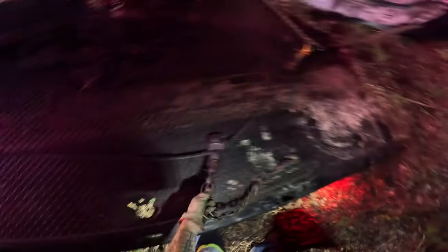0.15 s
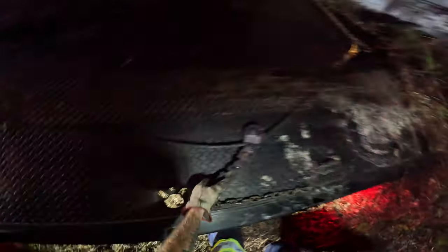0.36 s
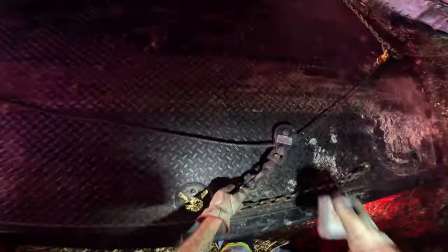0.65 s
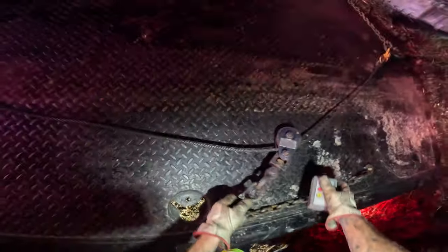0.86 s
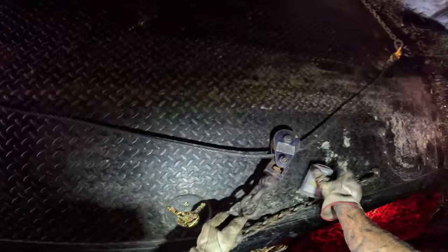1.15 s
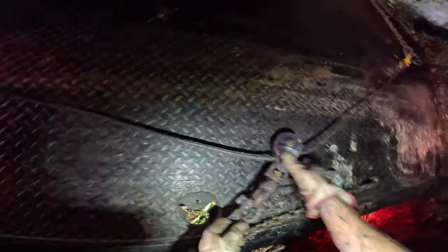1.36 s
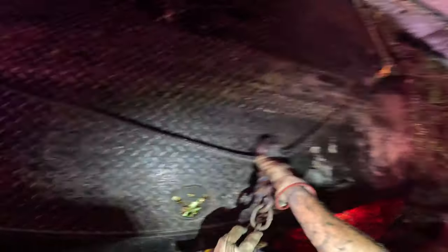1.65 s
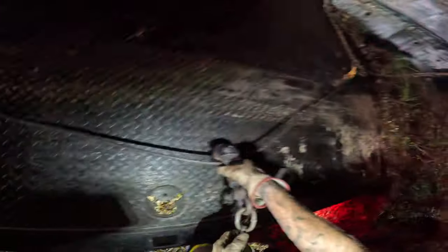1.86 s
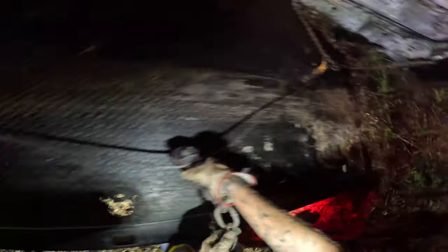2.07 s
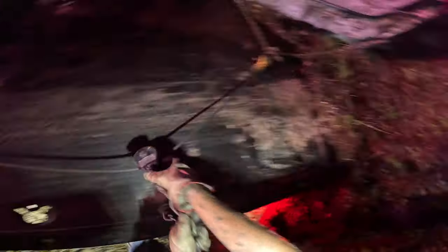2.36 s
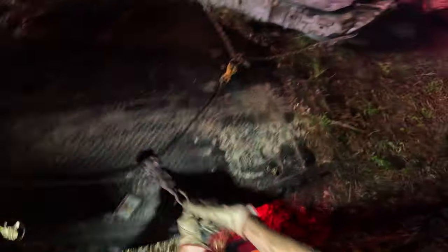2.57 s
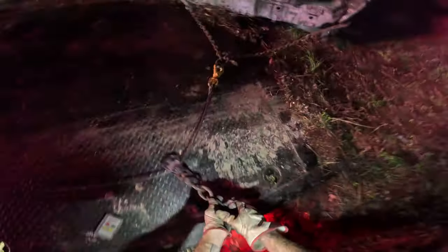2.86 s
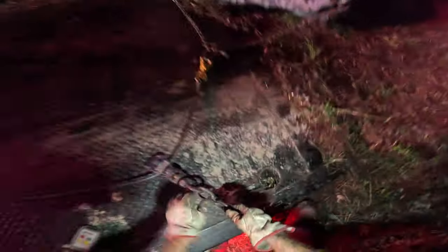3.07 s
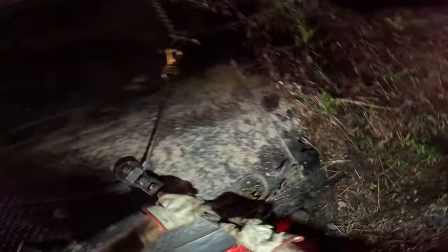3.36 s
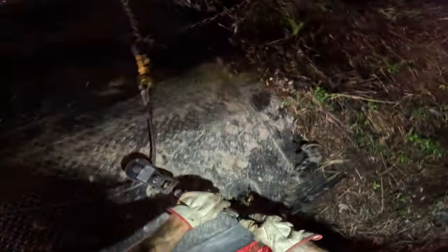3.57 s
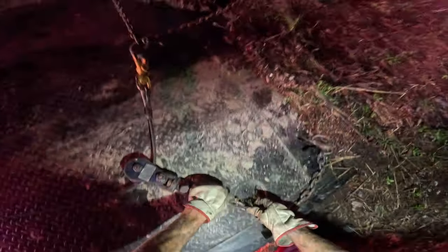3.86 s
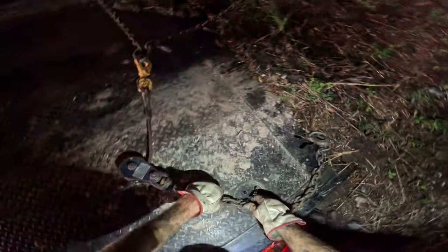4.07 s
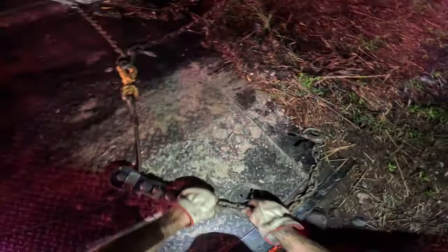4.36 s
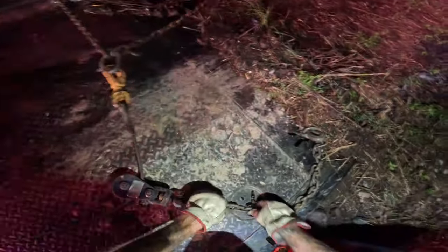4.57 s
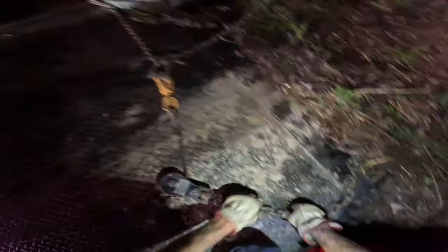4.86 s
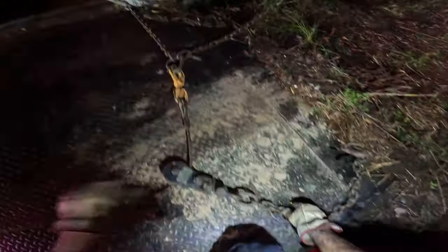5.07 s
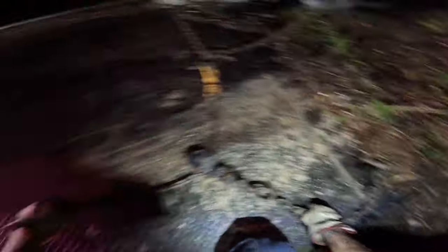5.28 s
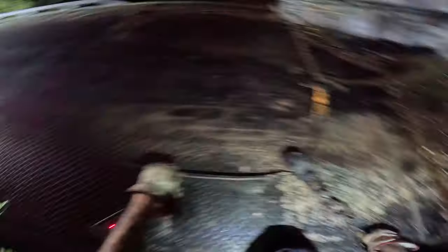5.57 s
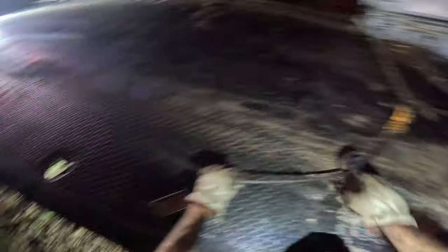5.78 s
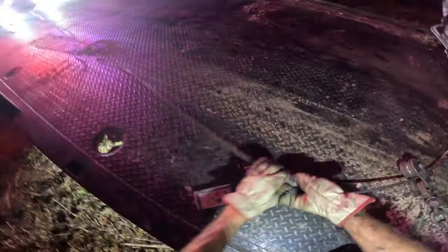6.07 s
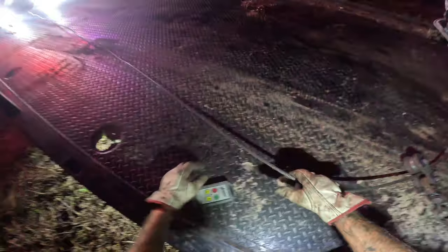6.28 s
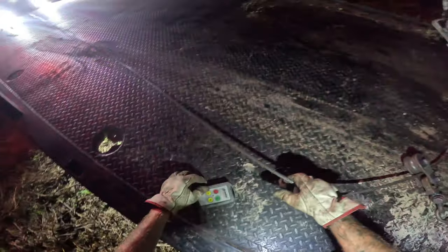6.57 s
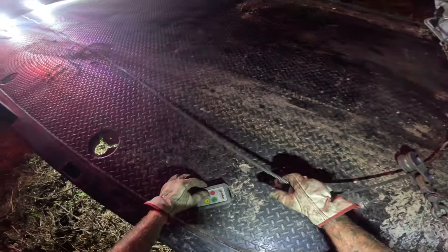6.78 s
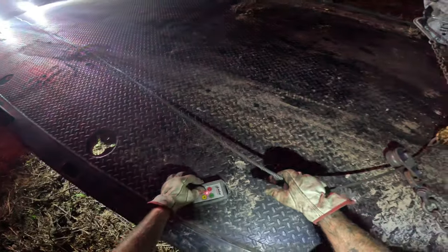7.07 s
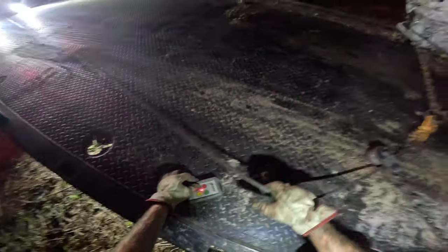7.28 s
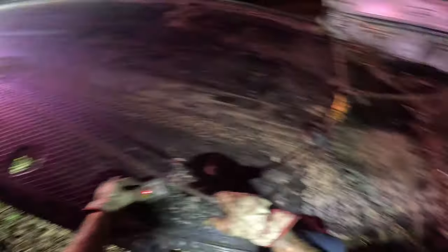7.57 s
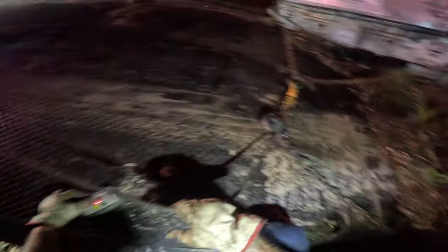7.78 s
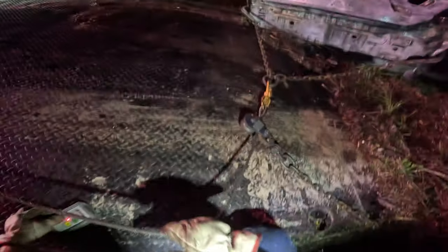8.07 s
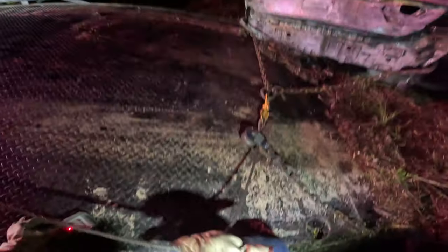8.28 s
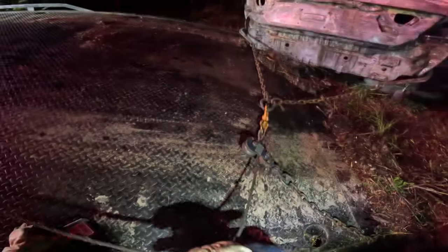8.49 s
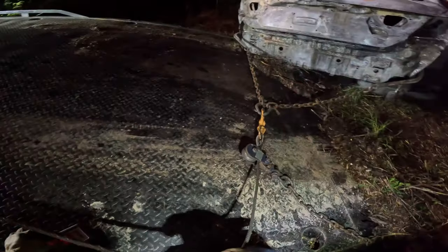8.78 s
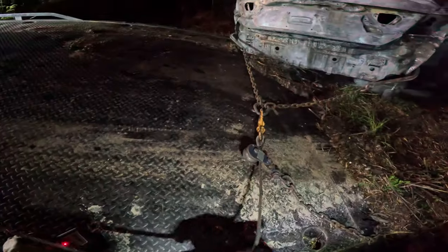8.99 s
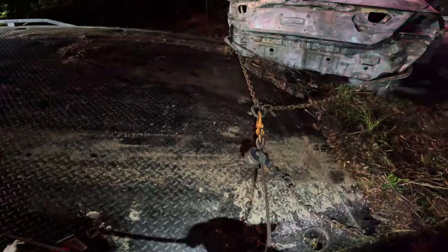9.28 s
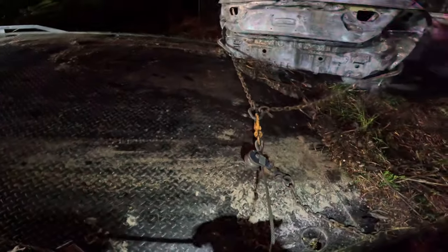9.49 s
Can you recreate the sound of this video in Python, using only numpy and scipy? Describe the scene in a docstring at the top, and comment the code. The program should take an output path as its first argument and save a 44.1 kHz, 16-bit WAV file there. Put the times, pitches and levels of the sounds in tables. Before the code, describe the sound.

A chain is hauled by hand over ribbed steel plate: sharp link cracks, deep hollow thuds, gritty scraping and piercing metal squeaks, all dry and near the body-worn microphone in open air. An idling truck engine hums underneath. The handling thins out after six seconds, then a winch starts abruptly with rushing oil, gear whine and a loud pulsating drone.

```python
"""A chain and a pulley block dragged over the steel flatbed of an idling tow truck, outdoors, microphone worn close.
Links clink as noise bursts rung around a pitch; the deck booms from crowded modes; steel squeals in sung modes.
Squeaks of the sheave are short rough sines, and cloth bumps the microphone in low noise. Behind, the engine and
pump hum in steady tones; then the winch starts, in gear and motor tones over rushing oil, its drone throbbing
against the engine."""
import sys
import numpy as np
from scipy import signal
from scipy.fft import rfft, irfft, next_fast_len
from scipy.io import wavfile
from scipy.ndimage import map_coordinates

SR = 44100
rng = np.random.default_rng(int(sys.argv[2]) if len(sys.argv) > 2 else 0)


def materialize(psi):
    """Save the field psi as 16-bit PCM at rate SR to the path in sys.argv[1].

    A 1-D psi becomes a single channel; in a 2-D psi each row is a channel.
    """
    bounded = np.clip(np.atleast_2d(psi).T, -1, 1)
    quanta = np.round(bounded * 32767).astype(np.int16)
    wavfile.write(sys.argv[1], SR, quanta)


N = 424683  # length in samples

# Clothes jostling the worn microphone. Each row: time in seconds, level in dB.
CLOTH_BUMP = [(1.98, -47), (2.2, -32), (2.3, -20.5), (2.48, -35)]

# Exhaust from where the worker stands. Each row: time in seconds, level of the firing tone in dB.
EXHAUST = [(.8, -51), (2.6, -40.5), (3.6, -46), (5.3, -29.5), (6.1, -42.5), (7, -38.5), (7.4, -34)]
# Hum of the hydraulic pump. Each row: time in seconds, level in dB before each line's own share.
PUMP_HUM = [(.8, -39), (2.3, -33), (5, -36.5), (7, -28.5)]
# Noise of the engine bay. Each row: frequency in Hz, relative density in dB per Hz.
BAY_NOISE = [(25, -18), (55, -14), (90, 0), (190, -4), (700, -22.5), (2400, -34), (7000, -44), (8500, -58),
             (15000, -72)]
FIRING_HZ = 56.7  # before the load slows the engine
SAG, SAG_S = 0.03, 0.25  # the engine slows by this share under the new load, most after this time

# Speed of the winch shaft. Each row: time in seconds, turns in Hz.
SHAFT_SPEED = [(7.15, 69.5), (7.55, 72.1), (7.95, 73.5), (8.63, 74.1), (9.63, 74.4)]
# Motor and gearbox lines. Each row: frequency at full speed in Hz, level in dB before it wavers.
MOTOR_LINES = [(108.3, -38), (172.5, -33), (259, -40), (280, -40), (521, -44), (818, -45), (955, -38),
               (1338, -46), (1710, -41), (1784, -43), (1859, -42), (3123, -47), (3569, -47), (4011, -56),
               (5795, -58), (6245, -61), (6692, -59)]
# Rush of oil and bearings. Each row: frequency in Hz, relative density in dB per Hz.
OIL_RUSH = [(25, -23.5), (50, -1), (330, -7), (1050, -17.5), (2600, -16.5), (4500, -33.5), (7000, -38.5),
            (8200, -53), (9400, -48.5), (13000, -52.5), (15000, -87.5)]
# The gear whine. Each row: time in seconds, level in dB.
GEAR_WHINE = [(7.52, -42), (7.57, -33), (8.02, -34), (8.13, -43), (8.38, -32), (9.2, -32.5), (9.6, -41)]
# Resonances of the winch housing. Each row: frequency in Hz, half width in Hz, gain in dB.
HOUSING_MODES = [(886, 44, -5.5), (2619, 59, -1.5)]
VALVE_S, SPIN_UP_S = 7.174, 0.135  # the valve opens; time from then to full flow
VALVE_SHARE = 0.25  # share of the flow that comes at once
OIL_DB, SURGE_DB, SURGE_S = -26.5, 6.5, 0.11  # rush under load; extra as the cable tightens, and its decay time
STROKE_HZ, THROB_DB = 64.7, -25.5  # the motor's strokes at full speed, which beat against the firing; peak level
MESH_HZ = 892.5  # gear tooth rate at full speed
OVERTONE_DB = -32  # third harmonic of the teeth, before the housing's gain
RING_DB, RING_FALL_DB_PER_S = -35.5, 1  # the housing rings, less as the pull settles

# Squeaks of the pulley. Each row: start in seconds, length in seconds, pitch in Hz, peak level in dB.
SQUEAKS = [(4.695, 0.13, 6680, -47), (4.936, .03, 6780, -37.5), (4.996, 0.53, 1714, -42),
           (5.192, 0.018, 3040, -34), (5.244, .028, 3170, -31.5), (6.246, .035, 2730, -39.5)]

# Squealing slips of steel on steel. Each row: start in seconds, length in seconds, level in dB,
# frequency in Hz of the mode that sings.
SQUEAL_SLIPS = [(2.866, 0.066, -26, 5120), (3.027, 0.023, -29, 7101), (3.106, .11, -32, 7699),
                (3.22, .022, -22.5, 7699), (3.25, 0.27, -23.5, 7101), (3.34, 0.12, -28, 10277),
                (3.4, 0.035, -21.5, 5120), (3.517, 0.047, -22.5, 7101), (3.691, 0.0086, -31.5, 5120)]
# Modes of the squealing steel. Each row: frequency in Hz, relative level in dB while another mode sings.
STEEL_MODES = [(5120, -8), (7101, -7.5), (7699, -14.5), (8338, -13), (10150, -20), (10277, -23.5),
               (13723, -30.5)]
SLIP_ATTACK_S, SLIP_FALL_DB_PER_S = 0.0053, 288  # a squeal builds up, then rings out

# The block and hook landing on the deck. Each row: time in seconds, boom level in dB, knock peak in dB,
# frequency in Hz of the plate's strongest mode.
LANDINGS = [(.064, -7, -21, 260), (1.334, -8.5, -13, 244), (1.718, -7.5, -5.5, 242),
            (2.975, -4, -15.5, 179.5), (3.713, -9, -12, 366), (3.787, -11.5, -10, 346),
            (4.048, -13.5, -16.5, 303), (4.458, -18.5, -29, 327), (4.953, -11, -24.5, 304.4),
            (5.379, -12.5, -18, 351), (5.683, -9, -21, 319), (5.851, -7.5, -26, 278),
            (5.904, -12, -19, 291), (7.412, -15, -10.5, 332)]
# Boom of the deck plate. Each row: frequency in Hz, relative density in dB per Hz.
DECK_BOOM = [(70, -28), (125, -6), (200, -3.5), (275, 1.5), (420, -1.5), (720, -9.5), (3500, -35),
             (12000, -80)]
# Ring of the deck plate. Each row: frequency in Hz, time to fall 60 dB in seconds.
DECK_DECAY = [(150, 0.19), (500, 0.14), (1500, 0.37), (8000, 0.031)]
MODE_SHARE, MODE_T60_S = 0.43, 0.24  # the strongest mode's part in a boom, and how long it rings
# The block's own short ring: centre, spread, extra gain, time to fall 60 dB.
KNOCK_HZ, KNOCK_OCTAVES, KNOCK_RING_DB, KNOCK_T60_S = 980, 0.85, 11.5, 0.016

# Pulls on the chain. Each row: start in seconds, rise in seconds, hold in seconds, deck boom in dB, scrape in dB.
CHAIN_PULLS = [(-.03, 0.031, 0.21, -19, -28), (0.281, 0.047, 0.25, -30.5, -34.5),
               (1.014, 0.23, 0.071, -22, -41.5), (1.623, 0.029, 0.15, -27, -47.5),
               (2.311, 0.097, 0.1, -29, -35), (2.468, 0.38, 0.38, -24, -20.5),
               (3.193, 0.037, 0.32, -41, -25.5), (3.537, 0.19, 0.025, -25, -32),
               (3.829, 0.13, 0.19, -29.5, -45), (4.412, 0.11, 0.16, -31.5, -45.5),
               (4.896, 0.051, 0.25, -29.5, -43.5), (5.34, 0.04, 0.029, -28, -39.5),
               (5.633, 0.1, .16, -20.5, -28.5), (6.362, 0.0038, 0.0093, -35.5, -51)]
# Rasp of the dragged steel. Each row: frequency in Hz, relative density in dB per Hz.
SCRAPE_COLOUR = [(300, -14), (600, -4.5), (920, -1), (1300, -5), (2900, -1.5), (7000, -12), (8800, -26.5),
                 (15500, -34.5)]
BOOM_FALL_DB_PER_S, SCRAPE_FALL_DB_PER_S = 79.5, 133  # once a pull ends
CATCH_RATE, BOOM_CATCH_DB, SCRAPE_CATCH_DB = 45, 2.5, 1.5  # links catch on the tread: knots per s, depths
GROAN_SCRAPE_DB = -20.5  # the force of scrape at which the plate groans fully

# Links striking steel. Each row: time in seconds, peak in dB, pitch in Hz, time to fall 60 dB in seconds.
LINK_HITS = [(0.02, -8, 5960, 0.024), (.071, -8, 4500, 0.046), (0.123, -9, 3850, 0.2),
             (.172, -12, 2920, .05), (.285, -7, 6860, 0.01), (.324, -1.5, 4140, 0.11),
             (.347, -4, 3450, 0.089), (0.38, -6, 4000, 0.14), (0.453, -10.5, 3200, 0.16),
             (.468, -4.5, 5200, 0.053), (.617, -6.5, 3870, 0.12), (0.638, -9, 3650, 0.085),
             (1.221, -14, 2330, .06), (1.289, -16, 2950, 0.051), (1.335, -18, 1840, 0.052),
             (1.395, -17.5, 2820, 0.057), (1.545, -15, 2440, 0.078), (1.67, -7, 6300, 0.01),
             (1.725, -10, 3420, 0.03), (1.777, -14.5, 3300, 0.047), (1.922, -16.5, 3850, 0.064),
             (1.99, -22.5, 2550, 0.12), (2.351, -14.5, 4430, .022), (2.404, -8.5, 1960, 0.18),
             (2.488, -2.5, 3060, 0.05), (2.62, -7, 3080, 0.064), (2.773, -7.5, 4070, 0.11),
             (3.267, -7.5, 5000, 0.089), (3.297, -4, 4000, 0.068), (3.317, -3.5, 5630, 0.061),
             (3.381, -7, 5030, 0.053), (3.455, -5, 5200, 0.12), (3.52, -11.5, 2570, 0.024),
             (3.651, -10.5, 3830, 0.037), (3.711, -5.5, 2130, 0.045), (3.819, -7, 3470, 0.045),
             (3.874, -11, 3350, .059), (4.264, -21, 2580, .054), (4.322, -13, 3760, 0.018),
             (4.549, -20, 1900, 0.08), (4.584, -9, 3320, 0.071), (4.662, -14.5, 2450, 0.047),
             (4.973, -17.5, 2700, 0.05), (5.748, -4.5, 4460, 0.15), (5.787, -4.5, 4280, 0.027),
             (5.8, -5.5, 5850, 0.057), (5.844, -11.5, 3600, 0.051), (5.906, -11.5, 4500, 0.049),
             (6.077, -17.5, 4330, .088), (7.101, -19, 2400, 0.013)]
# Colour common to the links. Each row: frequency in Hz, gain in dB.
LINK_COLOUR = [(200, 1.5), (900, 8), (3000, -0.5), (7000, -2), (8200, -16.5), (11000, -15), (15500, -35)]

TOP_HZ = 15900  # band limit


def amp(db):
    """Decibels to gain."""
    return 10 ** (np.asarray(db) / 20)


def unit(x):
    """Scaled to rms 1."""
    return x / np.sqrt(np.mean(x ** 2) + 1e-20)


def along(points, hz):
    """(Hz, value) points read on a log axis."""
    f, v = np.transpose(points)
    return np.interp(np.log(hz + 1), np.log(f + 1), v)


def curves(rows, outside=None):
    """One value per sample for each column after the time."""
    s, *cols = np.transpose(rows)
    return [np.interp(np.arange(N) / SR, s, c, outside, outside) for c in cols]


def wobble(rate):
    """A smooth random curve, rate knots a second."""
    knots = rng.standard_normal(int(N * rate / SR) + 4)
    return map_coordinates(knots, [np.arange(N) * rate / SR])


def coloured(x, gain):
    """x through a causal filter with the given gain at each frequency."""
    m = 2 * next_fast_len(len(x) // 2 + 2048, real=True)
    log_gain = np.log(np.maximum(gain(np.fft.rfftfreq(m, 1 / SR)), 1e-6))
    # Folding the cepstrum gives minimum phase.
    cepstrum = irfft(log_gain, m)
    cepstrum[1:m // 2] *= 2
    cepstrum[m // 2 + 1:] = 0
    return irfft(rfft(x, m) * np.exp(rfft(cepstrum)), m)[:len(x)]


def shaped(x, spectrum):
    """x given a spectrum, at rms 1."""
    return unit(coloured(x, lambda hz: amp(along(spectrum, hz))))


def grains(rate, spread_db):
    """Random tiny impacts of uneven size, at rms 1."""
    size = amp(spread_db * np.clip(rng.standard_normal(N), -2, 2))
    strikes = rng.random(N) < rate / SR
    return unit(strikes * size * np.sign(rng.standard_normal(N)))


def tones(lines, speed, waver_db, waver_rate):
    """(Hz, dB rms) lines that follow a relative speed, each wavering in strength."""
    clock = np.cumsum(speed) / SR
    total = np.zeros(N)
    for hz, db in lines:
        strength = amp(db + waver_db * np.clip(wobble(waver_rate), -2, 1))
        total += strength * np.sin(2 * np.pi * (hz * clock + rng.random()))
    return np.sqrt(2) * total


def stack(rate_hz, size=4096):
    """A rough pattern that repeats once per turn of a shaft, so it holds multiples of the shaft's rate."""
    turn = np.tile(signal.resample(rng.standard_normal(size // 16), size), 2)
    return np.interp(np.cumsum(rate_hz) / SR % 1 * size, np.arange(2 * size), turn)


def add(track, s, sound):
    """Mix a sound in at time s."""
    part = track[max(round(s * SR), 0):][:len(sound)]
    part += sound[:len(part)]


def gesture(start, rise, hold, fall_db_per_s):
    """An envelope that swells, holds, then dies away."""
    t = np.arange(N) / SR - start
    swell = np.clip(t / max(rise, 0.002), 0, 1) ** 1.01
    return swell * amp(-fall_db_per_s * np.maximum(t - rise - hold, 0))


def jostle():
    """Clothes bump the worn microphone: a brief swell of low noise."""
    rub = shaped(rng.standard_normal(N), [(15, -22), (40, -9.0), (75, -5.5), (600, -105)])
    return amp(curves(CLOTH_BUMP, outside=-np.inf)[0]) * rub


def engine():
    """A six-cylinder engine at fast idle drives the humming hydraulic pump, and sags as the winch loads it."""
    loaded = np.maximum(np.arange(N) / SR - VALVE_S, 0) / SAG_S
    speed = 1 - SAG * loaded * np.exp(1 - loaded)
    # Firing and motor strokes start in step when the valve opens.
    cycle = 2 * np.pi * FIRING_HZ * (np.cumsum(speed) / SR - VALVE_S)
    pulses = np.sin(cycle) + amp(-13.0) * np.sin(2 * cycle)
    firing = np.sqrt(2) * amp(0.81 * wobble(5.9)) * pulses
    hum_lines = [(198, -4.0), (396, -22.0), (594, -20.0), (792, -27.0), (1980, -35)]
    hum = tones(hum_lines, speed, waver_db=0.0, waver_rate=6.3)
    block = tones([(85.5, -45.0), (256.5, -51.5)], speed, waver_db=2.0, waver_rate=6.4)
    bay = shaped(rng.standard_normal(N), BAY_NOISE) * amp(-36.0)
    return amp(curves(EXHAUST)[0]) * firing + amp(curves(PUMP_HUM)[0]) * hum + block + bay


def housing(f):
    """Gain of the winch housing, a sum of resonant peaks."""
    return sum(amp(db) / (1 + ((f - hz) / width) ** 2) for hz, width, db in HOUSING_MODES)


def winch():
    """Motor strokes beat with the engine; gear teeth chatter, then whine and ring the housing over rushing oil."""
    t = np.arange(N) / SR
    # The valve opens, then the cable takes the load.
    strain = np.clip((t - VALVE_S) / SPIN_UP_S, 0, 1) ** 2
    flow = (t > VALVE_S) * (VALVE_SHARE + (1 - VALVE_SHARE) * strain)
    loaded_s = np.maximum(t - VALVE_S - SPIN_UP_S, 0)
    surge = np.exp(-loaded_s / SURGE_S)
    chatter = 0.03 * surge * wobble(150)
    shaft_hz = curves(SHAFT_SPEED)[0] * (1 + 0.00059 * wobble(25) + chatter)
    speed = shaft_hz / SHAFT_SPEED[-1][1]
    stroke = np.sin(2 * np.pi * STROKE_HZ * np.cumsum(speed * (t > VALVE_S)) / SR)
    throb = amp(THROB_DB) * stroke
    mesh = amp(curves(GEAR_WHINE)[0]) * tones([(MESH_HZ, 0)], speed, waver_db=2, waver_rate=25)
    third = tones([(3 * MESH_HZ, OVERTONE_DB)], speed, waver_db=3, waver_rate=20)
    overtone = housing(3 * MESH_HZ * speed) * third
    ring = amp(RING_DB - RING_FALL_DB_PER_S * loaded_s) * unit(coloured(rng.standard_normal(N), housing))
    drone = tones(MOTOR_LINES, speed, waver_db=1.0, waver_rate=11)
    churn = rng.standard_normal(N) * (1 + 0.26 * stroke)  # oil surges with each stroke
    oil = amp(OIL_DB + SURGE_DB * surge) * shaped(churn + 0.37 * stack(shaft_hz), OIL_RUSH)
    return flow * oil + strain * (mesh + overtone + ring + throb + drone)


def squeaks():
    """Short rough squeaks as the sheave turns a little: sines of jittering pitch."""
    out = np.zeros(N)
    for s, length, pitch_hz, db in SQUEAKS:
        swell = np.hanning(int(length * SR))
        phase = np.cumsum(pitch_hz + 900 * rng.standard_normal(len(swell))) / SR
        add(out, s, amp(db) * swell * np.sin(2 * np.pi * phase))
    return out


def squeal():
    """Steel sticks and slips on steel; each slip makes one mode sing and stirs the others."""
    modes_hz, stirred_db = np.transpose(STEEL_MODES)
    drive = np.zeros((len(modes_hz), N))
    for s, length, db, hz in SQUEAL_SLIPS:
        sings = np.arange(len(modes_hz)) == np.argmin(np.abs(modes_hz - hz))
        slip = gesture(s, SLIP_ATTACK_S, length - SLIP_ATTACK_S, SLIP_FALL_DB_PER_S)
        mode_db = db + np.where(sings, 0, stirred_db)
        drive = np.maximum(drive, amp(mode_db)[:, None] * slip)
    voices = np.zeros(N)
    for hz, level in zip(modes_hz, drive):
        voices += level * tones([(hz, 0)], 1 + 0.00337 * wobble(500), waver_db=5, waver_rate=55)
    judder = unit(amp(3 * wobble(260)))  # the uneven grip shakes all modes together
    return judder * voices


def plate_ring():
    """The deck plate's crowded modes; those near 1500 Hz ring longest and the highest die soonest."""
    hz, t, z = signal.stft(rng.standard_normal(SR // 3), SR, nperseg=256)
    fade = amp(-60 * t / along(DECK_DECAY, hz)[:, None])
    ring = signal.istft(z * fade, SR, nperseg=256)[1]
    return ring / np.linalg.norm(ring)


def block_gain(hz):
    """The block's broad resonance, falling away in the treble."""
    peak_db = KNOCK_RING_DB * np.exp(-(np.log2((hz + 1) / KNOCK_HZ) / KNOCK_OCTAVES) ** 2)
    return amp(peak_db) / (1 + (hz / 1400) ** 2)


def landings():
    """Block and hook land: a hard ringing knock, and the plate booms in a mode set by where they land."""
    out, t = np.zeros(N), np.arange(SR // 3) / SR
    for s, boom_db, knock_db, mode_hz in LANDINGS:
        crowd = shaped(plate_ring(), DECK_BOOM)[:len(t)]
        mode = np.sin(2 * np.pi * mode_hz * t) * amp(-60 * t / MODE_T60_S) * (1 - np.exp(-mode_hz * t))
        boom = MODE_SHARE * mode + (1 - MODE_SHARE) * crowd / np.abs(crowd).max()
        knock = coloured(rng.standard_normal(len(t)) * amp(-60 * t / KNOCK_T60_S), block_gain)
        add(out, s, amp(boom_db) * boom + amp(knock_db) * knock / np.abs(knock).max())
    return out


def clinks():
    """A link cracks against steel and rings around its own pitch; loose links scuff just before."""
    out, t = np.zeros(N), np.arange(SR // 5) / SR
    for s, db, pitch_hz, t60 in LINK_HITS:
        fade = amp(-60 * t / np.clip(t60, 0.008, 0.2)) + amp(-54 - 60 * t / 0.18)
        octaves = 1.2 * (t60 / 0.07) ** 0.27  # a light tick stirs fewer modes than a clash

        def bell(hz):
            """Link colour with a peak around this link's pitch."""
            return amp(along(LINK_COLOUR, hz) + 15.8 * np.exp(-(np.log2((hz + 1) / pitch_hz) / octaves) ** 2))

        hit = coloured(fade * rng.standard_normal(len(t)) + 9 * (t == 0), bell)
        scuff = coloured(amp(-60 * t / 0.006) * rng.standard_normal(len(t)), bell)
        scuff_level = amp(db - 4.5) * min(t60 / 0.18, 1) ** 1.4
        add(out, s, amp(db) * hit / np.abs(hit).max())
        add(out, s - 0.005, scuff_level * scuff / np.abs(scuff).max())
    return out


def rattle(rate, spread_db, t60, crack):
    """Many small link contacts, each a crack with a few modes of its own, at rms 1."""
    count = int(rate * N / SR)
    t = np.arange(SR // 25) / SR
    chance = rng.random((count, 7))  # place, size and five modes of each contact
    modes_hz = 1500 * 6 ** chance[:, 2:]
    rings = sum(np.sin(2 * np.pi * hz[:, None] * t) for hz in modes_hz.T)
    contacts = (rings + crack * rng.standard_normal(rings.shape)) * amp(-60 * t / t60)
    sized = contacts * amp(spread_db * chance[:, 1:2] ** 2)
    at = (chance[:, :1] * N).astype(int) + np.arange(len(t))
    return unit(np.bincount(at.ravel(), sized.ravel(), N)[:N])


def drag():
    """With each pull, links bump over the tread: the plate rumbles and groans under a dense rasp and light rattle."""
    boom, scrape = np.zeros((2, N))
    for s, rise, hold, boom_db, scrape_db in CHAIN_PULLS:
        boom = np.maximum(boom, amp(boom_db) * gesture(s, rise, hold, BOOM_FALL_DB_PER_S))
        scrape = np.maximum(scrape, amp(scrape_db) * gesture(s, rise, hold, SCRAPE_FALL_DB_PER_S))
    catching = np.clip(wobble(CATCH_RATE), -2, 1)
    bumps = grains(rate=900, spread_db=3.5)
    rumble = shaped(signal.fftconvolve(bumps, plate_ring())[:N], DECK_BOOM)
    t = np.arange(SR // 30) / SR
    chink = rng.standard_normal(len(t)) * amp(-60 * t / 0.0061)
    chinks = unit(signal.fftconvolve(grains(rate=900, spread_db=3.5), chink)[:N])
    grit = chinks + grains(rate=5000, spread_db=12)
    links = rattle(rate=130, spread_db=14, t60=0.032, crack=2.4)
    steel = shaped(grit + 1.3 * links, SCRAPE_COLOUR)
    groan_tones = tones([(880, -11), (965, -20)], 1 + 0.024 * wobble(200), waver_db=6.5, waver_rate=49)
    groan = scrape / amp(GROAN_SCRAPE_DB) * groan_tones
    deck = boom * amp(BOOM_CATCH_DB * catching) * rumble
    return deck + scrape * amp(SCRAPE_CATCH_DB * catching) * (steel + groan)


def scene():
    """Everything is close and reaches both channels alike."""
    background = jostle() + engine() + winch()
    work = squeaks() + squeal() + landings() + clinks() + drag()
    return np.tile(background + work, (2, 1))


def record(dry):
    """The microphone's channel passes nothing above its band limit."""
    m = next_fast_len(N + SR // 4)
    passed = np.fft.rfftfreq(m, 1 / SR) < TOP_HZ
    return irfft(rfft(dry, m) * passed, m)[:, :N]


dry = scene()
out = record(dry)
materialize(out)
```